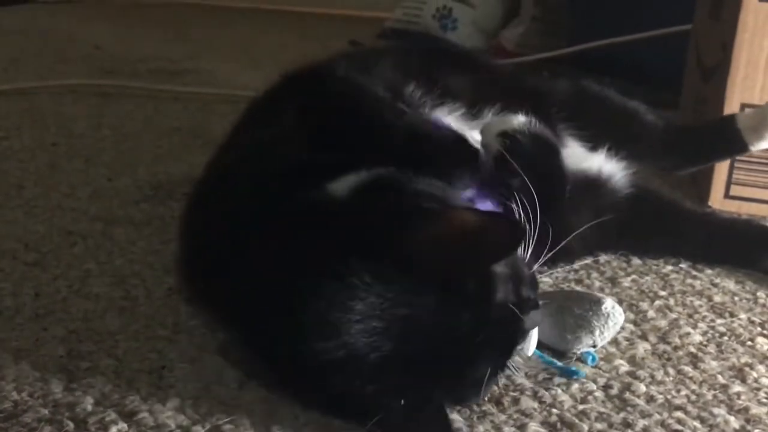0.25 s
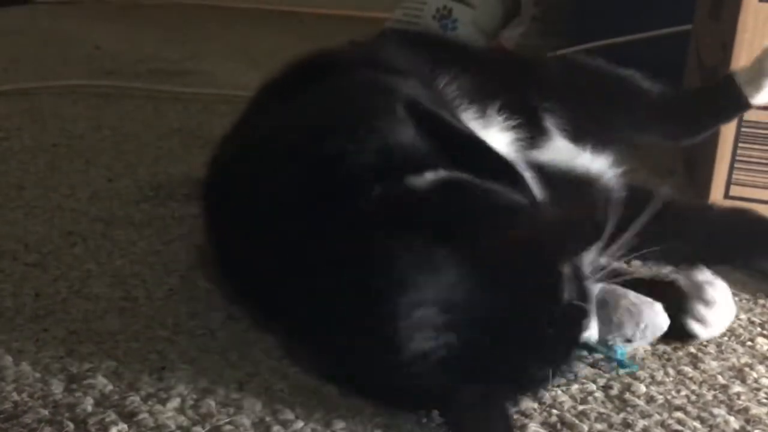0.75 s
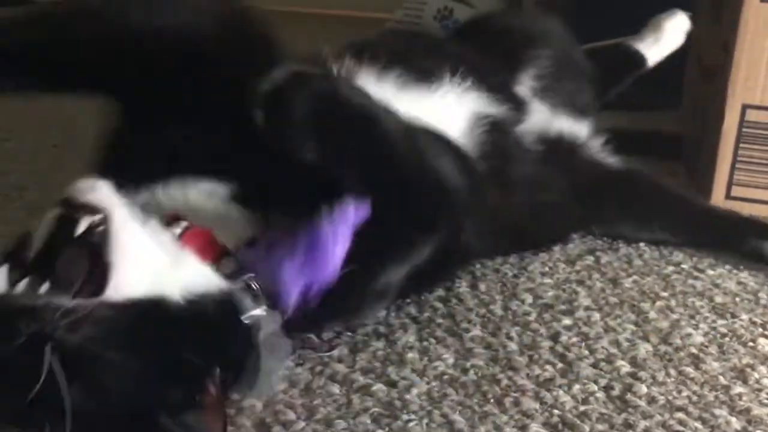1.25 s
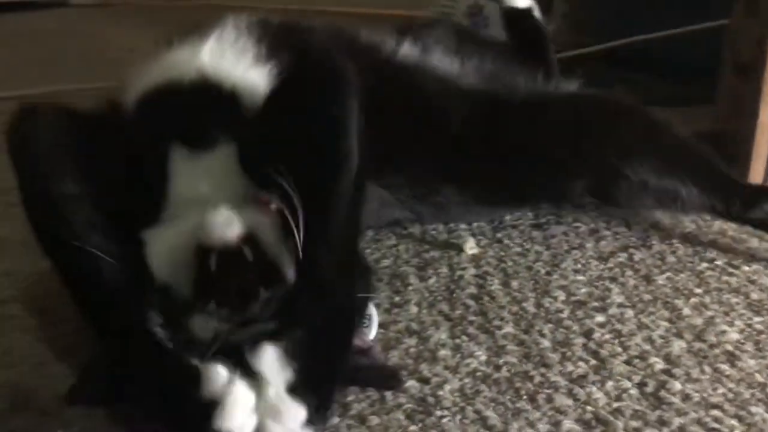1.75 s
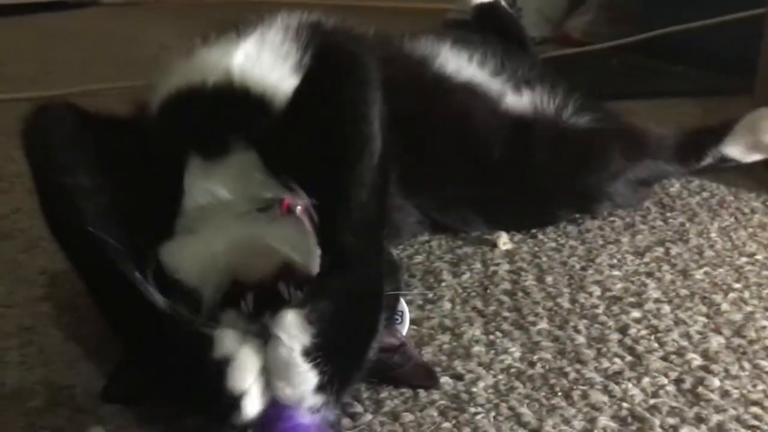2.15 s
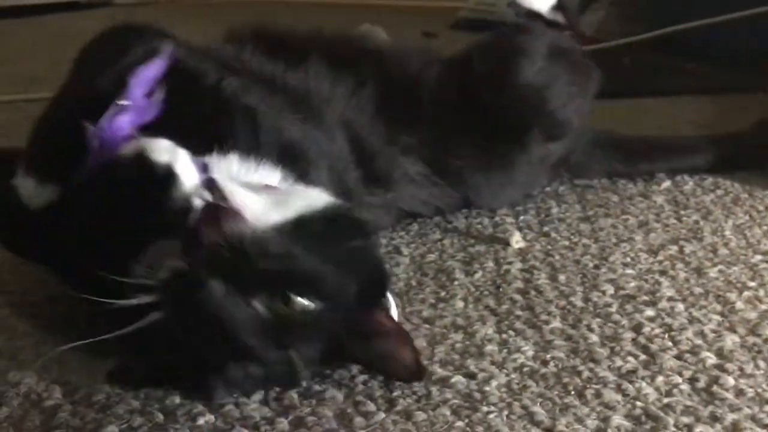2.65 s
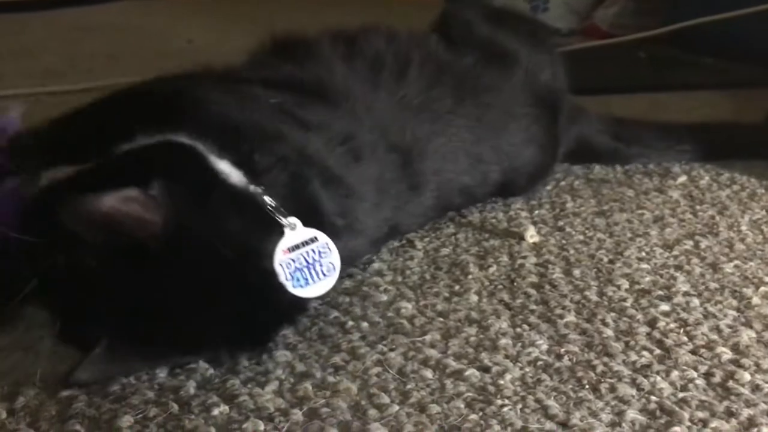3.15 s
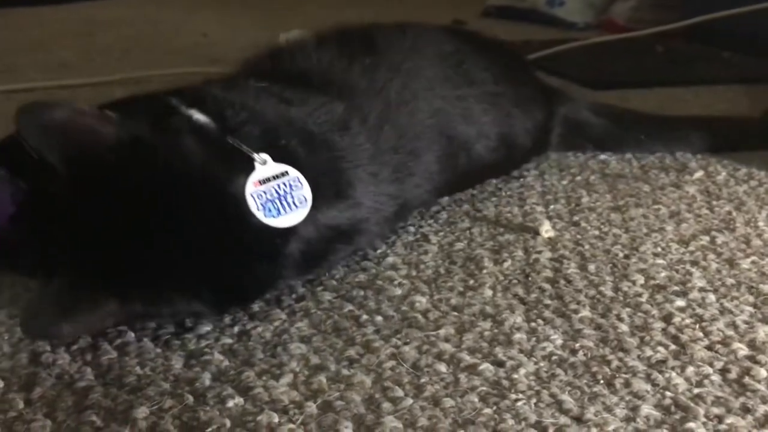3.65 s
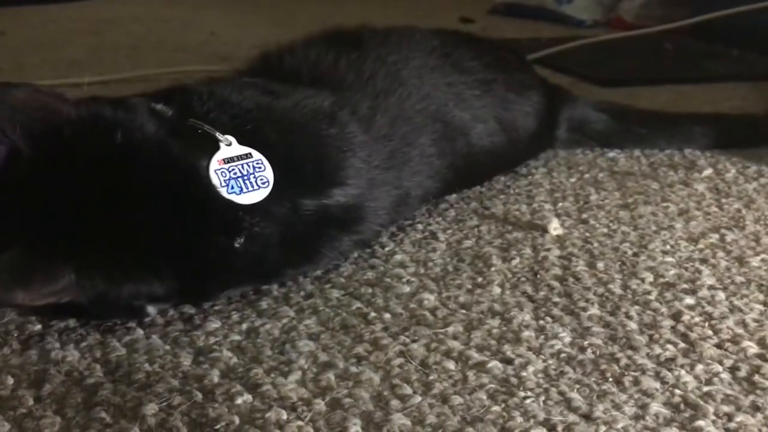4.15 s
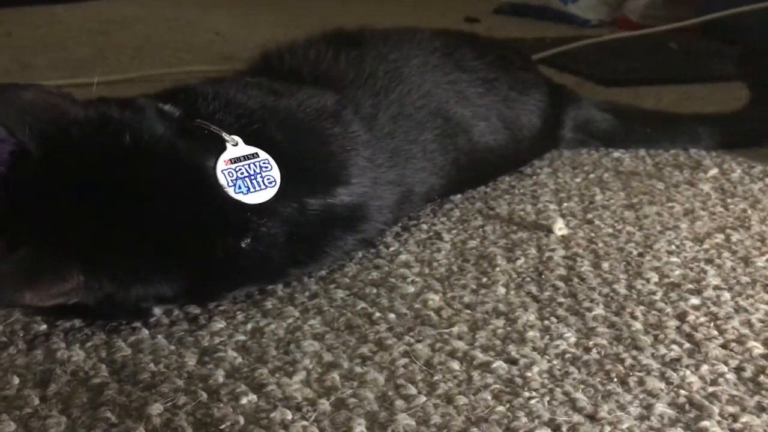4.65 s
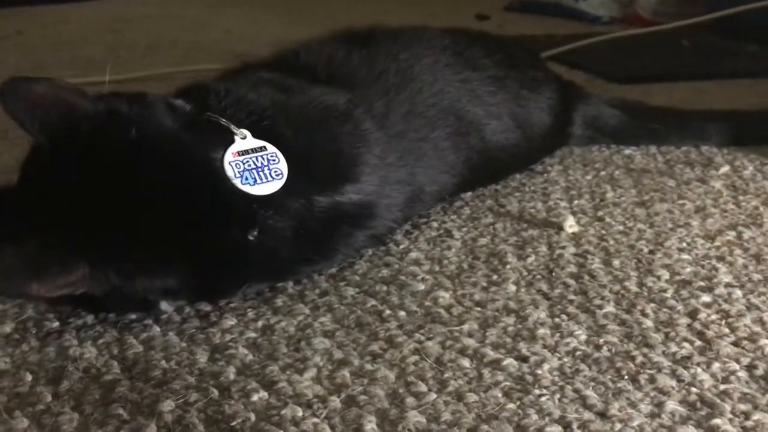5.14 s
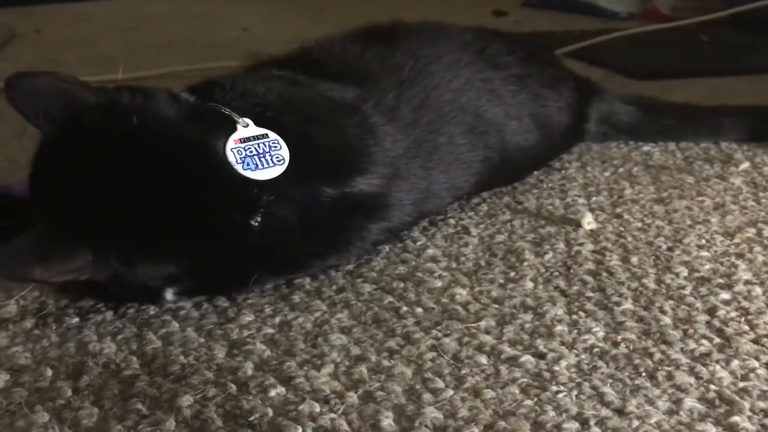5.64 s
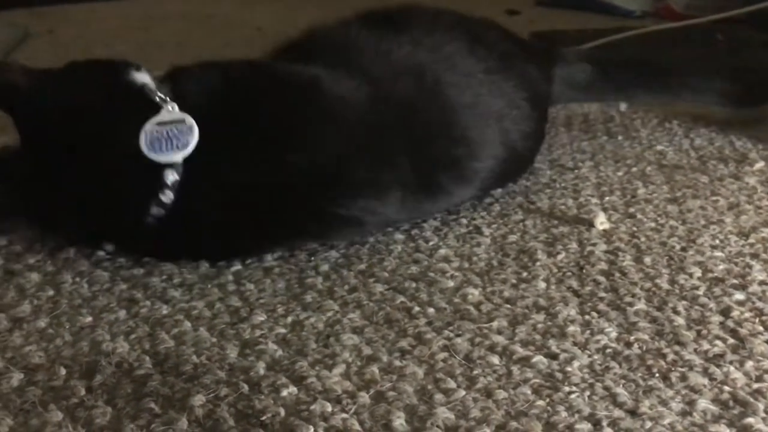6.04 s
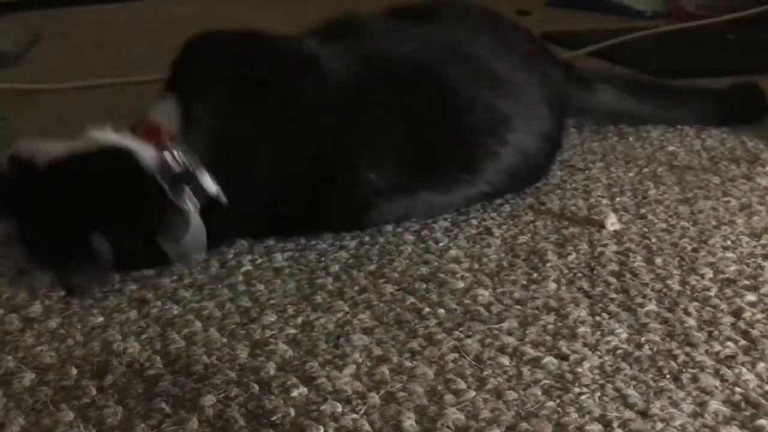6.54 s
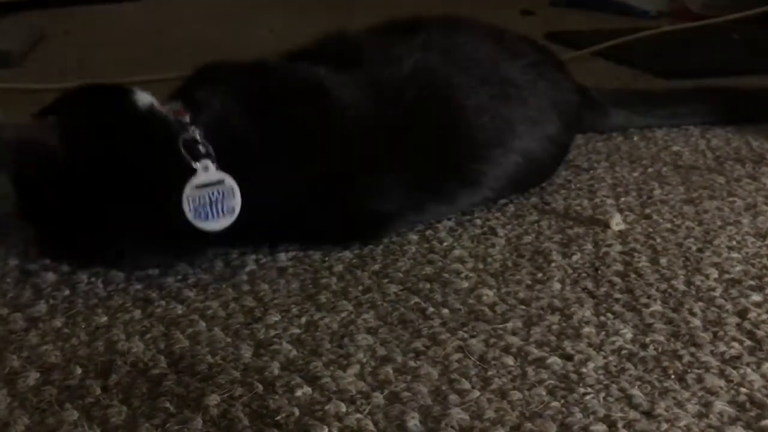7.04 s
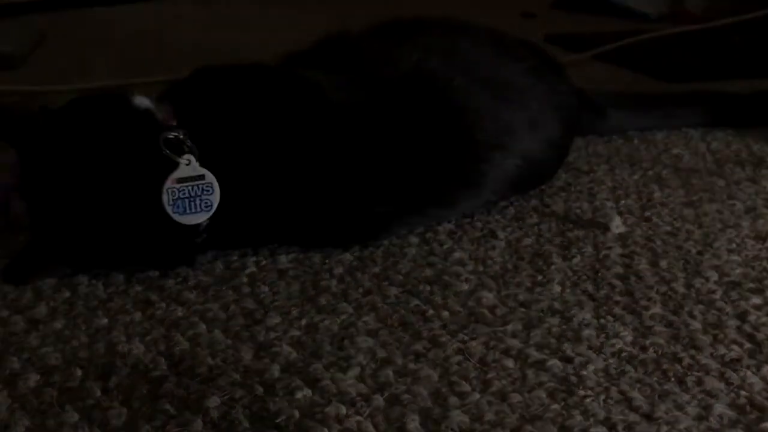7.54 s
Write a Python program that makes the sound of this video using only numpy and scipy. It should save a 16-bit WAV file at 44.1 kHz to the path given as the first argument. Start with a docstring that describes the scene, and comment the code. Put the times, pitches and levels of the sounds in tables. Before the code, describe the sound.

A cat rolls on carpet close by: crackling fibre snaps, fur scuffs, soft cardboard knocks and collar tag clinks over a steady low appliance hum.

```python
"""Cat rolling on a carpet

Close to the microphone a cat rolls on the pile: noise grains make the fur's scuff and hiss, short clicks its snaps.
Decaying sines clink as the collar tags; resonant noise and sines boom as a paw knocks a cardboard box.
Short low sine pulses are the body landing on the carpet. An appliance in the room hums in sines over
shaped noise, and a loose metal part on it rattles faintly, as resonances touched by small clicks.
"""
import sys
import numpy as np
from scipy import signal
from scipy.fft import rfft, irfft
from scipy.io import wavfile
from scipy.ndimage import uniform_filter1d, map_coordinates

SR = 44100
rng = np.random.default_rng(int(sys.argv[2]) if len(sys.argv) > 2 else 0)


def digitize_waveform(pressure):
    """Quantize a signal to 16-bit integers and store it at the path in sys.argv[1].

    Rows of a 2-D input are taken as channels; values are limited to [-1, 1].
    """
    field = np.atleast_2d(pressure).T
    bounded = np.clip(field, -1, 1)
    quanta = np.round(bounded * 32767).astype(np.int16)
    wavfile.write(sys.argv[1], SR, quanta)


def field_ratio(decibels):
    """Amplitude ratio for a level in dB (20 dB per decade); scalars and array-likes work."""
    return 10 ** (np.asarray(decibels, dtype=float) / 20)


N = 343534   # samples

# All levels are set ahead of the microphone.
# Mains hum lines: f/Hz, rms level/dB, spread of the waver/dB
HUM_LINES = [(59.7, -66.5, 1), (120.3, -59, 3.5), (239.74, -49.5, 0.06), (529, -75, 1.5)]
# Room resonances in the rumble: f/Hz, width/Hz, rms level/dB
RUMBLE_MODES = [(64.9, 14, -65), (111, 7.9, -62.5), (139.2, 9, -60), (163.9, 4.5, -72), (219.7, 31, -62),
                (263, 14, -74), (366.4, 14.4, -74), (408.6, 17.5, -77)]
# Colour of the smooth room noise: f/Hz, relative level per Hz/dB
ROOM_NOISE_COLOUR = [(18, -32), (40, -10.5), (75, -14.5), (170, -8.5), (300, -15), (450, -22.5),
                     (1000, -29), (2500, -33.5), (4700, -40.5), (7200, -45), (8800, -44), (10500, -47),
                     (13500, -48), (15700, -51), (16400, -83)]
ROOM_NOISE_DB = -58   # rms

# Fur sliding over the pile: middle t/s, length/s, dull scuff level/dB, hiss above scuff level/dB
FUR_STROKES = [(0.01, 0.11, -64.5, -14), (0.853, 0.14, -90, -3), (1.047, 0.16, -60.5, -6),
               (1.204, 0.043, -57.5, -3), (1.106, 0.05, -64.5, 0), (1.306, 0.08, -69.5, 4),
               (1.422, 0.087, -58.5, -2), (1.515, 0.059, -73, -3), (1.797, 0.019, -65, -22),
               (1.261, 0.025, -59.5, -11), (5.87, 0.032, -61, -20), (0.705, 0.14, -86, 9),
               (1.164, 0.35, -76, -6), (1.694, 0.34, -76, -18), (2.47, 0.21, -76, -6),
               (3.266, 0.32, -78, -17), (5.96, 0.18, -71, -14), (1.594, 0.13, -62, -12),
               (1.731, 0.1, -58, -8), (1.838, 0.047, -62, -19), (1.445, 0.063, -62, -14),
               (2.561, 0.041, -65, -12), (3.354, 0.05, -67, -20), (2.335, 0.11, -82, 0),
               (2.434, 0.033, -62, 5), (2.513, 0.061, -64, -8), (2.71, .3, -80, -4),
               (3.2, 0.13, -64.5, -19), (3.313, 0.076, -64, -30), (5.125, 0.14, -57.5, -15),
               (5.216, 0.15, -67, -6), (5.33, 0.16, -70, -14), (5.934, 0.096, -63.5, -12),
               (6.044, 0.13, -67, -26), (6.577, 0.13, -80, 9), (6.64, 0.12, -68, 3),
               (6.718, 0.26, -67, -12)]
# Fibres snapping under claws and fur: t/s, low, middle and high band base level/dB, plucked loop f/Hz
FIBRE_SNAPS = [(0.056, -58, -40, -43, 3670), (0.0631, -49, -48, -58, 3340), (0.072, -73, -55, -45.5, 4030),
               (0.1569, -75, -82, -61, 2870), (0.1923, -72, -60, -92, 3240), (0.2122, -67, -59, -92, 3340),
               (0.2637, -70, -63, -93, 3570), (0.2947, -60, -58, -62, 2960), (0.841, -75, -50, -56, 2300),
               (0.9775, -53, -47, -43, 3270), (0.9864, -32.5, -35, -38, 3860),
               (0.9887, -50, -48, -40.5, 3600), (0.9986, -60, -51, -59, 4050),
               (1.0138, -44, -48, -60, 3950), (1.0349, -55, -53, -53, 2350), (1.0387, -55, -46, -58, 2540),
               (1.0506, -44, -53, -76, 2520), (1.0577, -48, -44, -50, 3360), (1.0813, -59, -62, -42, 2540),
               (1.094, -49, -49, -49, 3010), (1.1061, -49, -43, -43, 3460), (1.1102, -74, -55, -44, 3060),
               (1.1451, -49, -46, -61, 2410), (1.156, -45, -39.5, -44, 3220), (1.171, -52, -44, -59, 3260),
               (1.1797, -62, -58, -67, 3110), (1.1919, -52, -46, -57, 3310), (1.2029, -61, -71, -53, 2880),
               (1.2155, -52, -46, -48, 3800), (1.2422, -64, -44, -40, 3200), (1.2527, -58, -66, -62, 3180),
               (1.2644, -63, -40, -41, 2410), (1.2744, -53, -56, -69, 2980), (1.2944, -75, -58, -58, 2680),
               (1.3217, -47, -48, -44, 4290), (1.3711, -62, -45, -45, 2840),
               (1.3767, -35.5, -46, -53, 2090), (1.404, -42, -37, -31.5, 3560),
               (1.4123, -50, -45, -44, 2460), (1.4662, -73, -59, -55, 2530), (1.485, -55, -53, -53, 3430),
               (1.4896, -38, -44, -43, 2670), (1.4945, -57, -49, -57, 2630),
               (1.5061, -34.5, -41, -46, 2600), (1.513, -51, -45, -40, 2900), (1.52, -45, -43, -37.5, 2950),
               (1.5257, -48, -42, -45, 2780), (1.55, -38.5, -48, -45, 2540), (1.5601, -68, -51, -49, 3070),
               (1.592, -51, -55, -58, 3470), (1.6208, -78, -55, -75, 2570), (1.6285, -60, -57, -55, 2520),
               (1.68, -56, -57, -41, 2960), (1.6817, -68, -55, -42, 2660), (1.6882, -37, -38, -33.5, 4290),
               (1.6953, -35.5, -34, -37, 2780), (1.7037, -47, -44, -61, 3440),
               (1.7124, -46, -42, -57, 2720), (1.735, -57, -51, -42.5, 3800), (1.7471, -63, -49, -57, 2600),
               (1.7534, -51, -57, -72, 2780), (1.766, -59, -59, -50, 2560), (1.772, -57, -59, -52, 2670),
               (1.7904, -43, -58, -74, 2670), (1.7964, -35.5, -46, -45, 2560),
               (1.8016, -44, -54, -89, 3700), (1.8203, -45, -45, -48, 3650), (1.8487, -41, -67, -86, 2690),
               (1.8582, -51, -65, -74, 2400), (1.8635, -42, -49, -50, 2570), (2.363, -60, -54, -45, 3680),
               (2.3945, -53, -48, -43, 3310), (2.3984, -49, -40.5, -45, 3200),
               (2.4069, -93, -62, -81, 3300), (2.4303, -46, -41, -55, 3040), (2.4338, -50, -50, -44, 2690),
               (2.4378, -47, -46, -44, 2850), (2.4524, -69, -69, -68, 3360), (2.4659, -70, -62, -64, 2790),
               (2.479, -79, -86, -63, 2610), (2.4965, -76, -83, -59, 3240), (2.5035, -60, -64, -52, 3270),
               (2.5549, -49, -48, -43, 3800), (2.5871, -54, -48, -50, 3000), (2.7176, -77, -55, -79, 2500),
               (2.7854, -53.5, -51, -62, 2990), (2.8103, -62, -58, -65, 2590),
               (2.8224, -63, -53, -60, 3460), (3.1049, -65, -58, -71, 2900), (3.1201, -52, -61, -63, 2920),
               (3.176, -50, -60, -69, 3830), (3.1891, -40.5, -75, -67, 2660), (3.2078, -55, -49, -43, 2650),
               (3.2256, -71, -78, -66, 2440), (3.285, -75, -62, -56, 3210), (3.2986, -48, -47, -62, 2850),
               (3.311, -72, -65, -67, 3190), (3.321, -47, -51, -72, 2620), (3.3419, -38, -46, -62, 2650),
               (3.39, -45, -52, -62, 2800), (3.4853, -61, -61, -64, 2690), (3.9984, -56.5, -61, -92, 3200),
               (4.9958, -77, -68, -55, 2930), (5.0731, -47, -51, -47, 2770), (5.0755, -46, -41, -48, 2910),
               (5.0796, -37, -47, -46, 2600), (5.0837, -33.5, -38.5, -57, 2500),
               (5.0908, -49, -43, -61, 2970), (5.1313, -40, -48, -63, 2560), (5.136, -40, -44.5, -56, 2520),
               (5.1801, -51, -78, -87, 2490), (5.1984, -70, -45, -43, 3040),
               (5.2021, -46.5, -50, -64, 2730), (5.3075, -47, -44, -55, 2780),
               (5.8136, -54, -58, -72, 2470), (5.8675, -53, -66, -88, 2620), (5.8738, -41, -61, -79, 2630),
               (5.882, -52, -65, -69, 2630), (5.8953, -43.5, -77, -74, 2560),
               (5.9063, -37.5, -39, -41.5, 2710), (5.913, -47, -43, -47, 3290),
               (5.9197, -37, -47, -64, 2600), (5.973, -47, -63, -61, 2580), (5.9841, -52, -67, -67, 2550),
               (6.0871, -57, -55, -62, 3000), (6.5359, -56, -56, -78, 3270), (6.5671, -69, -76, -81, 2990),
               (6.6019, -40, -42.5, -39, 3930), (6.6082, -45, -51, -60, 3570),
               (6.6667, -56, -48, -47, 4060), (6.6735, -48, -53, -48, 2790), (6.694, -65, -76, -60, 3300),
               (6.7089, -43.5, -57, -57, 2700), (6.7251, -46, -75, -83, 2790),
               (6.7314, -68, -68, -63, 2080), (7.3086, -52, -56, -71, 2940), (7.3195, -58, -59, -64, 3000)]
# Low, middle and high band of a snap: from f/Hz, to f/Hz
SNAP_BAND_EDGES = [(1800, 5200), (4300, 8260), (8200, 14600)]
# Tearing clicks in each band: level above the base/dB
TEAR_GAIN_DB = [4, 10.5, 14]
# Fizz of a snap in each band: level against the base/dB, t60/s
SNAP_FIZZ = [(-14.5, 0.036), (-6, 0.013), (-12, 0.023)]
# Brief ring of the pile in each band: f/Hz, width/Hz, share added
PILE_RINGS = [(2470, 310, 1.2), (6650, 280, 0.47), (13000, 1300, 0.17)]
# Band cancelled by the bounce off the floor: f/Hz, width/Hz, share removed
FLOOR_BOUNCE_DIP = (5270, 880, 0.2)
SMALL_SNAPS_PER_S, SMALL_SNAP_DB = 1300, 4   # while fur slides; level above the hiss
CATCHES_PER_S, CATCH_DB = 720, 4.5   # claws and collar in the loops; level above the scuff
TEAR_GAP_MAX_S, FIZZ_SPREAD_DB, LOOP_T60_S = 0.00055, 2, 0.0074

# Clear shakes of the loose part: t/s, clatter level/dB, lowest mode level/dB, long ring level/dB
CLEAR_SHAKES = [(.14, -74, -75, -74), (.3, -77, -93, -78), (.381, -71, -74, -82), (.464, -69, -72, -76),
                (.697, -80, -71, -86), (.811, -79, -75, -73), (0.938, -71.5, -69.5, -91),
                (1.6, -78, -87, -90), (2.003, -65.5, -76, -65), (2.095, -69, -70, -71),
                (2.15, -71.5, -67, -70), (2.246, -71.5, -73, -67), (2.286, -68, -79, -80),
                (2.56, -63.5, -76, -66), (2.644, -68, -76, -62.5), (2.75, -73, -76, -92),
                (2.889, -68.5, -72, -87), (2.965, -69.5, -75, -72), (3.111, -71, -77, -92),
                (3.244, -76, -77, -73), (3.535, -73, -77, -82), (3.621, -70, -79, -82),
                (3.677, -69.5, -78, -74), (3.769, -71, -76, -80), (3.872, -68, -78, -72),
                (4.112, -79, -83, -81), (4.15, -76, -78, -74), (4.231, -72, -83, -69),
                (4.436, -75, -76, -77), (4.576, -69.5, -78, -83), (4.659, -66.5, -66.5, -64),
                (4.754, -65, -73, -64), (4.833, -67, -69, -65), (4.904, -69, -71, -68.5),
                (4.987, -71, -73, -79), (5.307, -75, -72, -72), (5.366, -73, -83, -84),
                (5.455, -79, -88, -99), (5.524, -70, -69, -77), (5.58, -69, -69, -71),
                (5.681, -63.5, -66.5, -66), (5.747, -69, -70.5, -78), (5.82, -74, -74, -76),
                (5.984, -75, -67, -65), (6.039, -70, -72, -83), (6.121, -76, -84, -74),
                (6.255, -70, -67, -90), (6.466, -70.5, -67.5, -72), (6.535, -74, -78, -85),
                (6.73, -70, -70, -63.5), (6.825, -68, -72, -63), (7.146, -72, -75, -75),
                (7.374, -67, -75, -70), (7.591, -70.5, -70, -80), (7.651, -66.5, -63, -73),
                (7.687, -68, -67, -68)]
# Modes of the loose part in four groups: f/Hz, width/Hz, relative level/dB
CLATTER_MODES = [
    [(1928, 84, 0)],
    [(2900, 53, 11), (2780, 240, -8)],
    [(3480, 88, -3), (3670, 98, -22), (3746, 160, 0.5), (4230, 240, -13)],
    [(4650, 110, -11), (5146, 99, 3.5), (5430, 46, 1), (6110, 120, -12), (6000, 57, -5.5), (6520, 23, 3),
     (6690, 48, 1), (7300, 56, -23)],
]
# Mean share of each mode group in a shake: relative level/dB
GROUP_SHARE_DB = [-4.5, -8, 1, -3.5]
GROUP_SPREAD_DB = 1.5   # change from shake to shake
FAINT_SHAKE_GAP_S, FAINT_SHAKE_DB = 0.074, -75.5   # the part keeps trembling; mean gap and level
SHAKE_S, RING_SWELL_S, SHAKE_HISS_DB = 0.058, 0.13, -7.5   # hiss of the touches, against the clatter
FLEX_S = 0.00012   # spread of the rattle's wandering in time
RING_HZ, RING_WAVER_DB = 2357, 4
FAINT_RING_DB, RING_ROUGH_DB = -83, -4   # the touches roughen the ring

# Paw on cardboard: t/s, level before the soft onset/dB, t60/s
PAW_KNOCKS = [(0.9844, -38.5, 0.013), (1.3758, -36, 0.094), (1.386, -46, 0.055), (1.399, -41, 0.096),
              (1.411, -50, 0.11), (1.43, -54, 0.07), (1.796, -39, 0.031), (5.872, -50.5, 0.034)]
# Cardboard panel modes: f/Hz, width/Hz, relative level/dB
BOX_MODES = [(437, 160, -7.5), (574, 31, 0), (700, 67, 2), (834, 45, 0.5), (969, 69, 2.5), (1147, 37, 8.5),
             (1246, 99, 2.5), (1313, 67, 1), (1443, 53, 3.5), (1607, 84, 1), (1760, 120, -3),
             (1914, 110, -8), (2600, 780, -13.5)]
BOX_RING_DB = -2.5   # clean ring against the rattle of the panels
# Body weight landing on the carpet: t/s, sine level before its envelope/dB, f/Hz
BODY_THUMPS = [(.988, -40.5, 420), (1.2539, -33, 188), (1.5186, -31, 223), (1.801, -52, 446),
               (2.023, -49, 250)]

# Clinks: t/s, base level of each of the four pieces in turn/dB
TAG_CLINKS = [(0.988, -54, -63, -80, -75), (1.138, -54, -79, -78, -80), (1.183, -64, -80, -78, -66),
              (1.202, -44.5, -75, -80, -64), (1.209, -80, -84, -80, -76), (1.234, -56, -83, -62, -75),
              (1.2735, -54, -66, -58, -77), (1.2944, -56, -61, -56, -72), (1.31, -63, -74, -75, -80),
              (1.321, -51, -61, -66, -60), (1.333, -56, -61, -57, -56), (1.3444, -57, -75, -77, -68),
              (2.588, -64, -82, -80, -80), (2.605, -53.5, -67, -78, -80), (2.616, -66, -72, -75, -74),
              (6.557, -64, -81, -90, -88), (6.6, -40, -70, -64, -56), (6.612, -46, -70, -62, -52),
              (6.63, -42, -66, -55, -52), (6.668, -38, -56, -63, -70), (6.685, -54, -62, -62, -74),
              (6.7111, -57, -70, -76, -75), (6.8124, -54, -73, -71, -76)]
# Modes of the pieces on the collar: piece, f/Hz, level against the piece's base/dB, t60/s
TAG_MODES = [(0, 8625, 0.5, 0.1), (1, 5000, 4.5, 0.04), (1, 11600, 1, 0.14), (2, 5835, -2.5, 0.2),
             (3, 12850, -3, .25)]
CLINK_SPREAD_DB = 0.5   # each clink favours other modes
MUFFLED_S = 1.372   # the tag lands in the fur and stops ringing

ROOM_T60_S, CAT_ROOM_DB, PART_ROOM_DB = 0.31, -22, -9   # sends into the room tail
# Microphone ports and case: f/Hz, width/Hz, share added
MICROPHONE_MODES = [(2560, 350, -0.19), (4800, 480, -0.13), (6160, 220, 0.27), (10500, 390, -0.67),
                    (14400, 3900, -0.13)]


def rms_one(x):
    """Scales to rms 1."""
    return x / np.sqrt(np.mean(x ** 2) + 1e-20)


def drift(rate_hz):
    """Slow chance with spread 1: noise through two equal low-pass poles, drawn every 32 samples."""
    r = np.exp(-2 * np.pi * rate_hz * 32 / SR)
    slow = signal.lfilter([1], [1, -2 * r, r * r], rng.standard_normal(N // 32 + 3002))[3000:]
    return np.interp(np.arange(N) / 32, np.arange(len(slow)), rms_one(slow))


def resonate(x, hz, width_hz):
    """Two-pole resonance with gain 1 on top."""
    r = np.exp(-np.pi * width_hz / SR)
    poles = [1, -2 * r * np.cos(2 * np.pi * hz / SR), r * r]
    return signal.lfilter([(1 - r * r) / 2, 0, (r * r - 1) / 2], poles, x + 1e-18)


def band(x, low_hz, high_hz):
    """Butterworth band-pass."""
    return signal.sosfilt(signal.butter(2, [low_hz, high_hz], "band", fs=SR, output="sos"), x + 1e-18)


def bursts(times, levels_db, t60):
    """Envelope that jumps at each time and dies away."""
    marks = np.zeros(N)
    np.add.at(marks, np.round(np.asarray(times) * SR).astype(int), field_ratio(np.asarray(levels_db)))
    return signal.lfilter([1], [1, -field_ratio(-60 / (t60 * SR))], marks + 1e-18)


def swells(times, levels_db, length_s):
    """Smooth humps of one length centred on the times."""
    marks = np.zeros(N)
    marks[np.round(times * SR).astype(int)] = field_ratio(levels_db)
    return signal.fftconvolve(marks, np.hanning(round(length_s * SR)), "same")


def grains(per_s, spread_db):
    """Random clicks of uneven size; rms 1."""
    sizes = field_ratio(spread_db * np.minimum(rng.exponential(1, N), 5)) * rng.choice([-1, 1], N)
    return rms_one(sizes * (rng.random(N) < per_s / SR))


def appliance():
    """Wavering mains lines over resonant rumble and smooth room noise."""
    t = np.arange(N) / SR
    out = np.zeros(N)
    for hz, db, waver_db in HUM_LINES:
        level = field_ratio(db + waver_db * drift(2.7)) * np.sqrt(2)
        out += level * np.sin(2 * np.pi * hz * t + 0.17 * drift(1.6))
    for hz, width_hz, db in RUMBLE_MODES:
        rumble = resonate(rng.standard_normal(N), hz, width_hz)
        out += field_ratio(db) * rms_one(resonate(rumble, hz, 2 * width_hz))
    hz = np.arange(N // 2 + 1) * SR / N + 1
    colour_hz, colour_db = np.transpose(ROOM_NOISE_COLOUR)
    colour = field_ratio(np.interp(np.log(hz), np.log(colour_hz), colour_db))
    return out + field_ratio(ROOM_NOISE_DB) * rms_one(irfft(colour * rfft(rng.standard_normal(N)), N))


def fur_slide():
    """Dense grains scuff and hiss as fur slides; small snaps and catches of the loops stand out of them."""
    pile = grains(9000, spread_db=3.0) * field_ratio(3 * drift(50))   # the pile gives way in clumps
    bright = rms_one(band(pile, 4840, 9000))
    dull = rms_one(band(pile, 1260, 5800))
    t, scuff, hiss = np.arange(N) / SR, 0, 0
    for s, length_s, db, hiss_db in FUR_STROKES:
        hump = np.cos(np.pi * np.clip((t - s) / length_s, -0.5, 0.5)) ** 2
        scuff = scuff + field_ratio(db) * hump
        hiss = hiss + field_ratio(db + hiss_db) * hump
    small = grains(SMALL_SNAPS_PER_S, spread_db=3) * field_ratio(SMALL_SNAP_DB) * hiss
    catches = grains(CATCHES_PER_S, spread_db=3) * field_ratio(CATCH_DB) * scuff
    out = hiss * bright + scuff * dull + band(small, 2400, 17500)
    out += band(band(catches, 1760, 4800), 1760, 4800)
    hz, width_hz, share = PILE_RINGS[0]
    return out + share * resonate(catches, hz, width_hz)


def fibre_snaps():
    """Each snap is four fibres tearing in quick turn, a short fizz, a ring of the pile and a plucked loop."""
    crackle = grains(5000, spread_db=5.0)
    s, *bands_db, loop_hz = np.transpose(FIBRE_SNAPS)
    luck = rng.standard_normal((len(s), 3))
    late = np.cumsum(rng.random((len(s), 4)), axis=1) * TEAR_GAP_MAX_S
    at = np.round((s[:, None] + late - late[:, :1]) * SR).astype(int)
    parts = rng.standard_normal((3, len(s), 4))
    parts = parts / np.sqrt(np.sum(parts ** 2, axis=2, keepdims=True))
    out = np.zeros(N)
    for k, (edges, level_db) in enumerate(zip(SNAP_BAND_EDGES, bands_db)):
        # a narrower band needs a stronger click for the same level
        gain = field_ratio(level_db + TEAR_GAIN_DB[k]) / np.sqrt(2 * (edges[1] - edges[0]) / SR)
        clicks = np.zeros(N)
        np.add.at(clicks, at, parts[k] * gain[:, None])
        tearing = band(clicks, *edges)
        fizz_db, t60 = SNAP_FIZZ[k]
        envelope = bursts(s, level_db + fizz_db + FIZZ_SPREAD_DB * luck[:, k], t60)
        # fibres creak for a few ms before they give
        fizz = uniform_filter1d(envelope, size=380) * rms_one(band(crackle, *edges))
        out += band(tearing, *edges) + fizz   # twice through: steep edges
        hz, width_hz, share = PILE_RINGS[k]
        out += share * resonate(tearing + fizz, hz, width_hz)
    after = np.arange(600)   # samples
    pluck = np.sin(2 * np.pi * loop_hz[:, None] * after / SR)
    pluck = pluck * field_ratio(-60 * after / SR / LOOP_T60_S) * np.minimum(after / 15.0, 1)
    np.add.at(out, at[:, :1] + after, field_ratio(bands_db[0] + 1.5)[:, None] * pluck)
    return out


def fur():
    """Sliding and snapping fur, less the band that the bounce off the floor cancels."""
    out = fur_slide() + fibre_snaps()
    hz, width_hz, share = FLOOR_BOUNCE_DIP
    return out - share * resonate(out, hz, width_hz)


def loose_part():
    """Each shake is a short swell of uneven touches in thin metal; one mode sings on a little longer."""
    s, db, low_db, ring_db = np.transpose(CLEAR_SHAKES)
    luck = rng.standard_normal((100, 6))   # one row for each faint shake
    faint_s = np.cumsum(FAINT_SHAKE_GAP_S * (1 + 0.19 * np.clip(luck[:, 0], -2, 2)))
    heard = faint_s < N / SR - 0.01
    faint_s, luck = faint_s[heard], luck[heard]
    levels_db = db[:, None] + GROUP_SHARE_DB + GROUP_SPREAD_DB * rng.standard_normal((len(s), 4))
    levels_db[:, 0] = low_db
    touches = grains(2500, spread_db=1.0)

    ring = swells(s, ring_db, RING_SWELL_S)
    ring = ring + swells(faint_s, FAINT_RING_DB + 6.6 * luck[:, 1], RING_SWELL_S)
    tone = np.sin(2 * np.pi * RING_HZ * np.arange(N) / SR + 1.22 * drift(10.8))
    tone = tone * field_ratio(RING_WAVER_DB * drift(30.0))
    ring = ring * (tone + field_ratio(RING_ROUGH_DB) * rms_one(resonate(touches, RING_HZ, 70)))

    clatter = swells(s, db + SHAKE_HISS_DB, SHAKE_S) * rms_one(band(touches, 2200, 8500))
    for k, modes in enumerate(CLATTER_MODES):
        faint_db = FAINT_SHAKE_DB + GROUP_SHARE_DB[k] + GROUP_SPREAD_DB * luck[:, 2 + k]
        shaken = touches * (swells(s, levels_db[:, k], SHAKE_S) + swells(faint_s, faint_db, SHAKE_S))
        steady, rings = 0, 0
        for hz, width_hz, mode_db in modes:
            steady = steady + field_ratio(mode_db) * resonate(touches, hz, width_hz)
            rings = rings + field_ratio(mode_db + 2.05 * drift(5.8)) * resonate(shaken, hz, width_hz)
        rings = rings / np.std(steady)
        # the thin metal flexes, so its pitches wander
        flexed = np.arange(N) + FLEX_S * SR * drift(8)
        clatter += map_coordinates(rings, [flexed], order=3, mode="nearest")
    return clatter, ring


def cardboard_box():
    """Cardboard panels rattle as resonant noise and ring as sines of wandering phase."""
    noise, t = rng.standard_normal(N), np.arange(N) / SR
    rattle, ring = 0, 0
    for hz, width_hz, db in BOX_MODES:
        rattle = rattle + field_ratio(db) * resonate(resonate(noise, hz, width_hz), hz, 3 * width_hz)
        ring = ring + field_ratio(db) * np.sin(2 * np.pi * hz * t + 2.9 * drift(width_hz / 6))
    panels = rms_one(rms_one(rattle) + field_ratio(BOX_RING_DB) * rms_one(ring))
    knocks = sum(bursts([s], [db], t60) for s, db, t60 in PAW_KNOCKS)
    # a soft paw: the boom builds over 3 ms
    return panels * uniform_filter1d(knocks, size=130, origin=64)


def body_thumps():
    """The carpet gives one or two dull cycles under the body: a sine in a bell-shaped envelope."""
    t, out = np.arange(N) / SR, np.zeros(N)
    for s, db, hz in BODY_THUMPS:
        cycles = (t - s) * hz
        out += field_ratio(db) * np.sin(2 * np.pi * cycles) * np.exp(-(cycles / 0.46) ** 2)
    return out


def tags():
    """Each clink stops the last ring and strikes the modes of each piece with strengths of its own."""
    s, *pieces_db = np.transpose(TAG_CLINKS)
    t = np.arange(N) / SR
    last = np.maximum(np.searchsorted(s, t) - 1, 0)
    muffled = (t > MUFFLED_S) & (s[last] < MUFFLED_S)
    ringing = (t > s[0]) & ~muffled
    luck, out = rng.standard_normal((len(s), len(TAG_MODES))), 0
    for k, (piece, hz, mode_db, t60) in enumerate(TAG_MODES):
        db = pieces_db[round(piece)] + mode_db + (piece > 0) * CLINK_SPREAD_DB * luck[:, k]
        # the swinging tag turns, so its ring flutters
        ring_db = db[last] - 60 * (t - s[last]) / t60 + 3.5 * drift(85.0)
        envelope = uniform_filter1d(ringing * field_ratio(np.minimum(ring_db, 0)), size=50)
        out = out + envelope * np.sin(2 * np.pi * hz * t + 0.94 * drift(40.0))
    return out


def room(x):
    """A soft furnished room: a dull noise tail of energy 1."""
    t = np.arange(int(0.4 * SR)) / SR
    tail = band(rng.standard_normal(len(t)), 140, 3400) * field_ratio(-60 * t / ROOM_T60_S) * (t > 0.004)
    return signal.fftconvolve(x, tail / np.sqrt(np.sum(tail ** 2)))[:N]


def scene():
    """The cat is near, with little room on it; the clatter of the loose part carries far more room."""
    cat = fur() + cardboard_box() + body_thumps() + tags()
    clatter, ring = loose_part()
    tail = room(field_ratio(CAT_ROOM_DB) * cat + field_ratio(PART_ROOM_DB) * clatter)
    return (cat + clatter + ring + tail + appliance())[None]


def low_pass(x):
    """Removes everything above the highest recorded frequency."""
    return signal.sosfilt(signal.butter(12, 16670, fs=SR, output="sos"), x)


def record(dry):
    """A phone microphone with peaks and dips of its own, then a steep cut of the top."""
    for hz, width_hz, share in MICROPHONE_MODES:
        dry = dry + share * resonate(dry, hz, width_hz)
    mix = signal.sosfilt(signal.cheby2(8, 50, 17300, fs=SR, output="sos"), dry)
    return low_pass(mix)


dry = scene()
out = record(dry)
digitize_waveform(out)
```